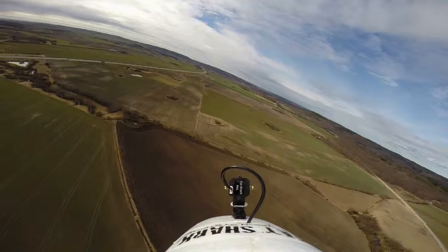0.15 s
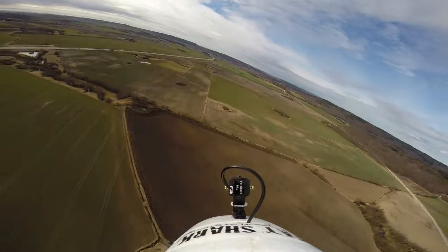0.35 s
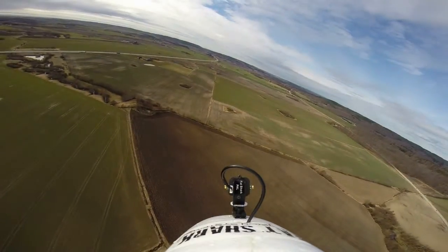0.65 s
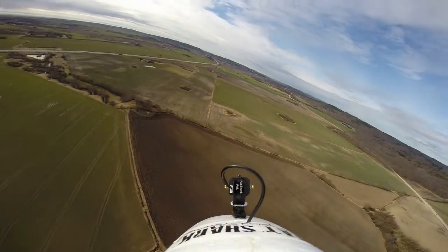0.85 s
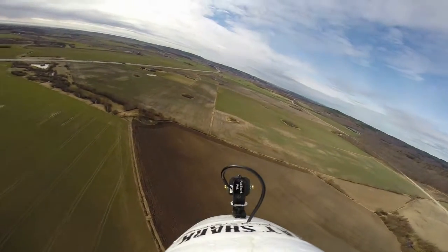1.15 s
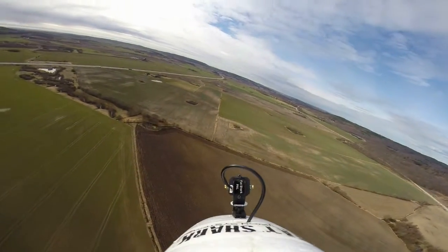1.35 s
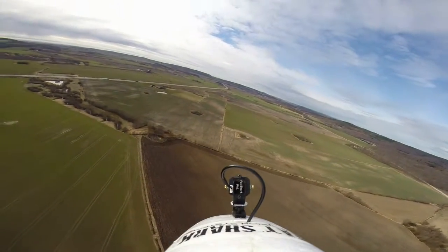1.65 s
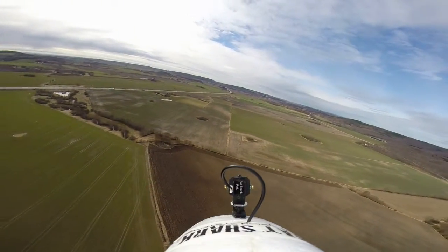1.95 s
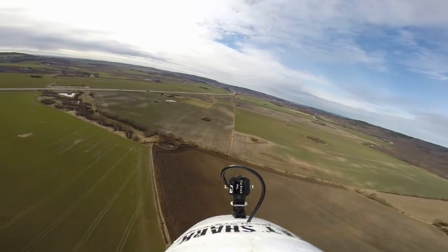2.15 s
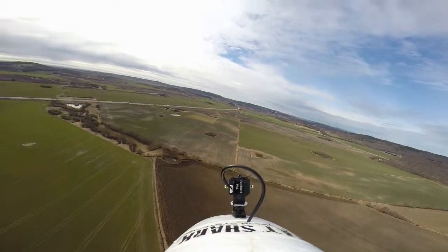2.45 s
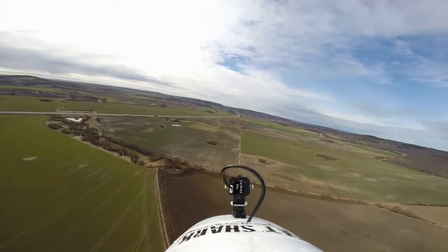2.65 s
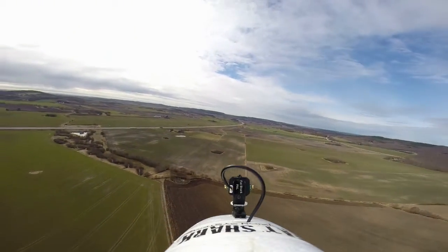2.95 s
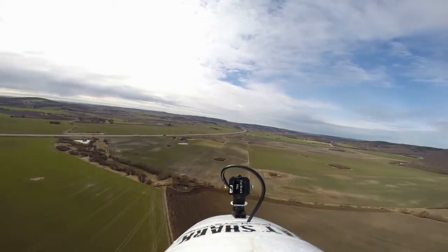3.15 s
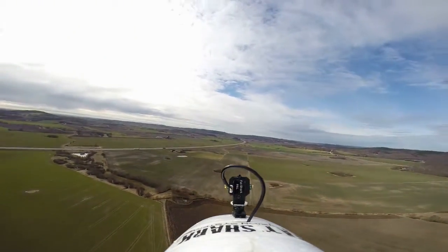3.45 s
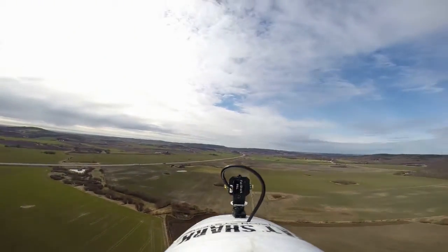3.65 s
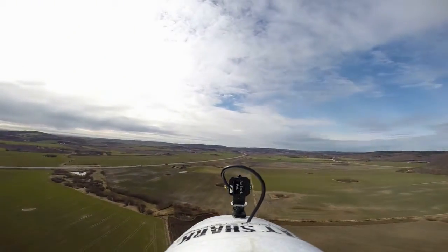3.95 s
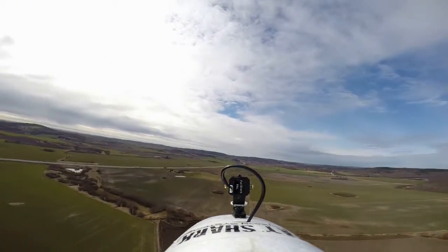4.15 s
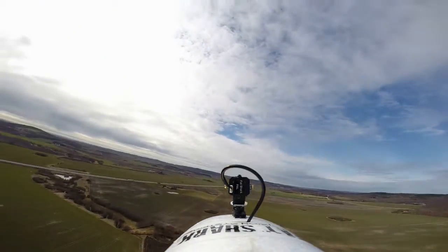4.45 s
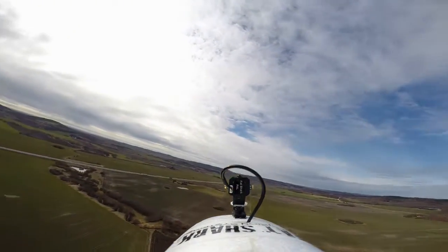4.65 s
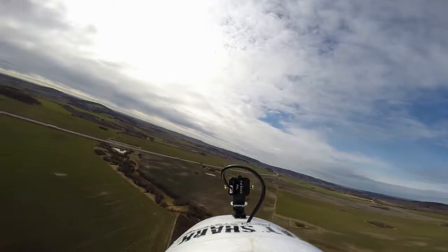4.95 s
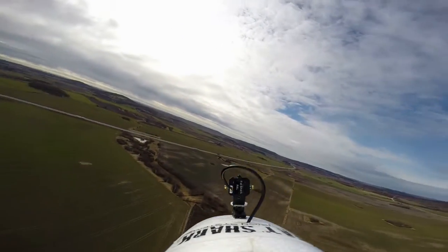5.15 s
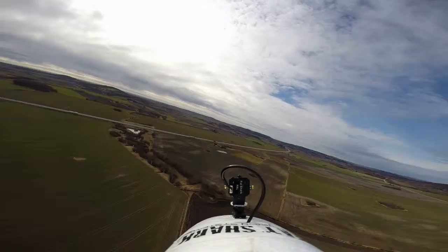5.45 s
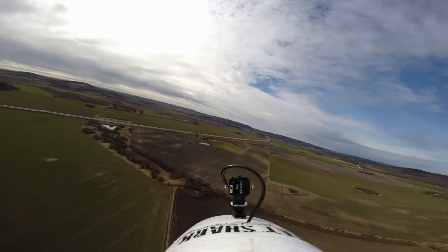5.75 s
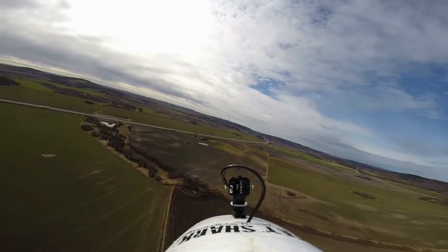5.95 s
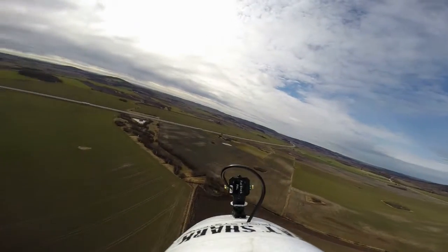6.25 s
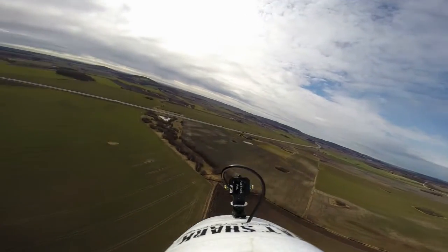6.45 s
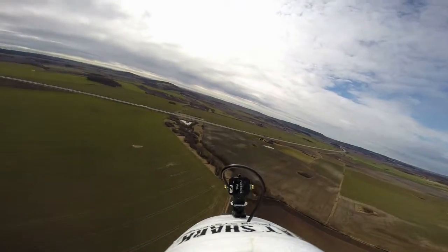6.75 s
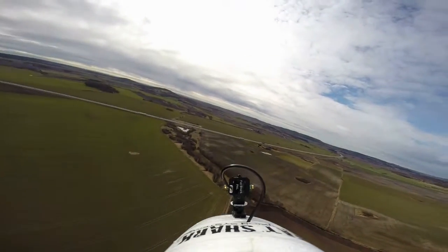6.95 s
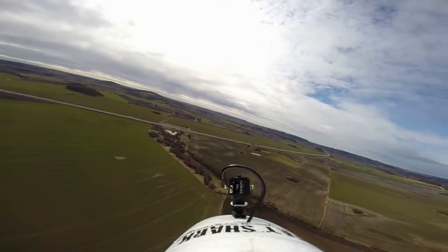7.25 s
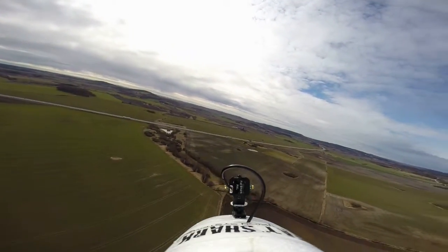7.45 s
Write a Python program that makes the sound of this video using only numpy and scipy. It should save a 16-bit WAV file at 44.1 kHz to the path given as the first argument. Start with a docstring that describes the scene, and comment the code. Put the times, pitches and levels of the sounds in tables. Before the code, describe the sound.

Onboard a model plane, the motor's whine sinks to silence, leaving rumbling, hissing wind and later rapid dry servo twitches.

```python
"""A microphone in a closed housing rides on a small electric model plane. At first the motor drives, a sum of
sines at multiples of its turns, with a thin whistle and the steady switching tone of the speed controller.
Then the throttle closes and the motor runs down until it falls silent, while the wind of the glide, coloured
noise in six layers, rumbles and hisses in the housing's resonances. Later a control servo twitches, in short
bursts of filtered noise, and whirs and ticks on its 22 ms command frame while it steers."""
import sys
import numpy as np
from scipy import signal
from scipy.fft import rfft, irfft, next_fast_len
from scipy.io import wavfile

SR = 44100
rng = np.random.default_rng(int(sys.argv[2]) if len(sys.argv) > 2 else 0)


def waveform_to_disk(signal):
    """Save audio, clipped to [-1, 1], as 16-bit WAV at the path in sys.argv[1]."""
    frames = np.transpose(np.atleast_2d(signal))
    scaled = np.clip(frames, -1, 1) * 32767
    samples = np.round(scaled).astype(np.int16)
    wavfile.write(sys.argv[1], SR, samples)


N = 334719

FRAME_S = .022   # one command frame of the servo


def amp(db):
    """Turns a level in dB into a gain."""
    return 10 ** (np.asarray(db) / 20)


def rms_one(x):
    """Scales a sound to rms 1."""
    return x / np.sqrt(np.mean(x ** 2) + 1e-20)


def in_time(rows):
    """Joins each column of a table by straight lines, one value a sample; the first column is the time."""
    s, *columns = np.transpose(rows)
    return [np.interp(np.arange(N) / SR, s, column) for column in columns]


def spells(rows, rise_db, fall_db):
    """Gain that holds within each span and slopes away on either side, in dB per second."""
    t = np.arange(N) / SR
    gain = 0
    for start, end, db in rows:
        before_db = rise_db * np.maximum(start - t, 0)
        after_db = fall_db * np.maximum(t - end, 0)
        gain = gain + amp(db - before_db - after_db)
    return gain


def drift(rate_hz):
    """Slow random wandering of rms 1: noise through two equal one-pole low-passes."""
    step = 40   # samples between computed values
    r = np.exp(-2 * np.pi * rate_hz * step / SR)
    noise = rng.standard_normal(N // step + 2002)
    slow = signal.lfilter([1], [1, -2 * r, r * r], noise)[2000:]   # without the filter's start
    return np.interp(np.arange(N) / step, np.arange(len(slow)), rms_one(slow))


def resonate(x, hz, width_hz):
    """Two-pole resonance that lets its own pitch through at gain 1 and weakens the rest."""
    r = np.exp(-np.pi * width_hz / SR)
    poles = [1, -2 * r * np.cos(2 * np.pi * hz / SR), r * r]
    return signal.lfilter(np.array([1, 0, -1]) * (1 - r * r) / 2, poles, x)


def sine(hz, start=None):
    """Gliding tone of rms 1; its start, in cycles, is random unless given."""
    if start is None:
        start = rng.random()
    cycles = np.cumsum(hz) / SR + start
    return np.sqrt(2) * np.cos(2 * np.pi * cycles)


def bell(hz, top_hz, width_hz, top_db):
    """Bell-shaped peak of a resonance, in dB at each frequency."""
    return top_db / (1 + (2 * (hz - top_hz) / width_hz) ** 2)


def coloured(spectrum, peaks=()):
    """Noise of rms 1, shaped by a spectrum and the bell-shaped peaks on it."""
    size = next_fast_len(N)
    hz = np.maximum(np.arange(size // 2 + 1) * SR / size, 1)
    points, db = np.transpose(spectrum)
    shape_db = np.interp(np.log(hz), np.log(points), db, left=-80, right=-80)
    for top_hz, width_hz, top_db in peaks:
        shape_db = shape_db + bell(hz, top_hz, width_hz, top_db)
    noise = rfft(rng.standard_normal(size))
    return rms_one(irfft(noise * amp(shape_db), size)[:N])


def power():
    """Motor power: one at open throttle, sinking to zero as it closes."""
    cut_s, fall_s = 0.82, 0.17   # start and length of the closing
    return np.clip(1 - (np.arange(N) / SR - cut_s) / fall_s, 0, 1)


def motor():
    """Multiples of the turn (orders) waver, and swell and sink as they sweep through the airframe's resonances."""
    # Speed of the shaft. Each row: time in seconds, turns per second.
    shaft = [(0.0, 134.8), (0.4, 135.2), (0.55, 134.6), (0.73, 132.6), (0.84, 126.6), (0.92, 119.8),
             (1.04, 107.3), (1.12, 101.6), (1.19, 98.05), (1.28, 94.7), (1.37, 87.3), (1.44, 83.5),
             (1.56, 73.3), (1.66, 63.6), (1.76, 53.2), (1.84, 43.1), (1.92, 32.5), (2.05, 21.7)]
    # Orders: 1-4 imbalance and blades, 11-14 and 22-26 magnet poles.
    # Each row: multiple of the turn, level in dB under power, level in dB coasting, both ahead of the airframe.
    orders = [(1, -12.5, -11.5), (2, -15, -19), (3, -20, -26), (4, -32, -31), (5, -31, -44), (6, -36, -42),
              (7, -43, -48), (8, -39, -45), (9, -33, -45), (10, -35, -45), (11, -29, -35), (12, -32, -38),
              (13, -26.5, -26), (14, -34, -35), (15, -22, -43), (16, -18, -47), (17, -18, -47),
              (18, -36, -46), (19, -44, -44), (20, -36, -34), (21, -40, -33), (22, -35, -29),
              (23, -38, -29), (24, -31, -28), (25, -40, -33), (26, -35, -31), (27, -40, -35),
              (28, -25, -36), (30, -28, -45)]
    # How the airframe carries sound to the housing, from low to high. Each row: frequency in Hz, gain in dB.
    fuselage = [(40, -20), (50, -13), (60, -5), (67, -8), (80, 0), (115, -2), (128, -10), (135, -5),
                (141, -14), (152, -21), (168, -5), (195, -1), (222, -7), (243, 0), (263, -7), (271, -20),
                (281, -5), (300, -7), (345, -4), (385, -1), (406, 2), (430, 0), (452, -13), (480, 0),
                (525, -16), (545, -9)]
    shell = [(620, -5), (680, -15), (820, 1), (930, -8), (970, -2), (1035, -20), (1090, -5), (1170, -6),
             (1235, -17), (1300, 1), (1385, -4), (1460, 7), (1550, 4), (1640, 10), (1740, 4), (1753, 1),
             (1758, -7), (1800, -2), (1890, -4)]
    mount = [(2000, -10), (2200, -14), (2350, -11), (2450, -6), (2600, 1), (2750, -2), (2860, -12),
             (3300, -17), (4100, -20)]
    # Resonances that only one order rings. Each multiple has: frequency in Hz, width in Hz, height in dB.
    bells = {11: (912, 45, 16), 24: (2250, 90, 21), 26: (2200, 100, 25)}
    # Orders die as the shaft slows. Each row: highest multiple it holds for, turns per second where the loss
    # begins, loss in dB for each turn per second below that.
    fades = [(2, 41, 1.1), (4, 88, .3), (14, 54, .4), (30, 92, 1.2)]

    turns, = in_time(shaft)
    points, carried_db = np.transpose(fuselage + shell + mount)
    drive = power()
    out = 0
    for k, powered_db, coasting_db in orders:
        hz = k * turns
        db = coasting_db + (powered_db - coasting_db) * drive
        db = db + np.interp(hz, points, carried_db)
        if k in bells:
            db = db + bell(hz, *bells[k])
        below, loss_db = next(fade[1:] for fade in fades if k <= fade[0])
        db = db + loss_db * np.minimum(turns - below, 0)
        low = k < 5
        waver_db = .5 * drift(2.5) if low else 1.9 * drift(15)
        # the low orders peak together: one push a turn
        out = out + amp(db + waver_db) * sine(hz, 0 if low else None)
    end_s = shaft[-1][0]
    return out * np.clip((end_s - np.arange(N) / SR) / .04, 0, 1)   # fades out over 40 ms


def whistle():
    """A thin tone under power, slightly unsteady in pitch and level."""
    level_db = -30 + 2.1 * drift(15)
    return amp(level_db) * sine(2330 + 12 * drift(6)) * power() ** 4


def switching_tone():
    """The speed controller switches at a fixed rate, heard as a steady high tone that comes and goes."""
    # When it sounds. Each row: start in seconds, end in seconds, level in dB.
    switching = [(0.0, 0.83, -50.5), (1.55, 2.1, -59)]
    return spells(switching, rise_db=85, fall_db=62) * sine(np.full(N, 8018))


def servo_twitches():
    """Each twitch is a few ms of gear chatter, noise that rings in the housing's resonances."""
    # Strong twitches. Each row: start in seconds, approximate peak in dB, centre frequency in Hz.
    strong = [(4.7446, -13.5, 2400), (4.883, -18, 2400), (5.146, -11.5, 1770), (5.1667, -11, 1880),
              (5.1904, -9, 1800), (5.2105, -12, 2210), (5.234, -12, 1820), (5.2774, -11, 1780),
              (5.3213, -16, 2060), (5.3445, -15, 1850), (5.365, -11.5, 1970), (5.3887, -18, 2400),
              (5.4106, -13, 2150), (5.5408, -16, 2320), (5.7887, -15, 2510), (5.917, -15, 2270),
              (5.9584, -22, 2390), (6.3325, -15, 2340), (6.51, -19, 2010), (6.532, -13, 1840),
              (6.575, -9.5, 2240), (6.6204, -18, 2280), (6.641, -12, 1830), (6.7535, -10.5, 1880),
              (6.7755, -11, 2100), (6.8169, -16, 2180), (6.8407, -11, 2140), (7.0374, -14, 2280),
              (7.1048, -12.5, 1800)]
    rise_s, fall_s = .0012, .003   # rise of the amplitude, fall of the energy
    crest = 6.04   # usual peak over rms of a burst
    t = np.arange(SR // 30) / SR
    attack = t / rise_s * np.exp(1 - t / rise_s)
    tail = 1.8 * np.exp(-t / fall_s / 2) * (t > rise_s)
    dull = signal.butter(8, 2750, fs=SR, output="sos")   # the housing keeps the top out
    out = np.zeros(N + len(t))
    for s, db, hz in strong + faint_twitches():
        chatter = rng.standard_normal(len(t)) * (attack + tail)
        burst = resonate(resonate(chatter, hz, 510), hz, 640)
        burst = burst + amp(-11) * resonate(chatter, 1290, 540)
        burst = burst + amp(-20) * resonate(chatter, 840, 290)
        burst = signal.sosfilt(dull, burst)
        out[round(s * SR):][:len(t)] += amp(db) * rms_one(burst) / crest
    return out[:N]


def faint_twitches():
    """Rows like the strong twitches, on a random share of the command frames while the servo is restless."""
    restless_s = (4.66, 7.2)   # start and end in seconds
    share = .35   # of the frames
    first, last = np.round(np.array(restless_s) / FRAME_S)
    times = np.arange(first, last) * FRAME_S
    draw = rng.random((len(times), 3))
    db = -21 + 10 * (draw[:, 0] - .5)
    hz = 2200 + 400 * (draw[:, 1] - .5)
    rows = np.transpose([times, db, hz])
    return list(rows[draw[:, 2] < share])


def servo_steering():
    """While the servo arm travels, its gears whir as coloured noise and every command frame ticks."""
    # Travels of the arm. Each row: start in seconds, end in seconds, level of the whir in dB.
    steering = [(4.9, 5.48, -57), (6.55, 6.95, -55)]
    # Colour of the whir. Each row: frequency in Hz, relative level in dB per Hz.
    gears = [(8000, -25), (8500, -2), (9000, -2), (9400, -4), (9900, -14), (10500, -6), (11200, -13),
             (12500, -16), (13500, -30)]
    whir = amp(.8 * drift(24)) * coloured(gears)
    frame = np.cos(np.pi * np.arange(N) / SR / FRAME_S) ** 6   # one pulse a frame
    ringing = resonate(resonate(rng.standard_normal(N), 1860, 690), 1800, 830)
    ticks = rms_one(frame * amp(1.7 * drift(20)) * ringing)
    travel = spells(steering, rise_db=53, fall_db=50)
    return travel * (whir + amp(24) * ticks)   # ticks 24 dB over the whir


def wind():
    """Turbulence shakes the housing; small eddies make the upper layers flutter together."""
    # Strength of the wind. Each row: time in seconds, then levels in dB of rumble, buffet, rush and cavity roar,
    # then extra brightness of the hiss in dB, shared by two shelves.
    strength = [(0.0, -33.5, -33, -38, -30.5, 10.5), (0.76, -31.5, -34.5, -32.5, -28, 4.5),
                (1.14, -32, -36, -39.5, -29, 3), (1.65, -35, -35, -37, -29, 5),
                (1.9, -30, -32.5, -36.5, -29, -1), (2.3, -26.5, -30, -33.5, -25, 0),
                (2.55, -28, -28, -30.5, -22, -1), (3.21, -21.5, -23, -27.5, -20, 3),
                (3.68, -19.5, -25.5, -30, -20.5, 2), (4.0, -25.5, -26.5, -30.5, -22.5, 2),
                (4.46, -22.5, -30, -31.5, -22, 2), (4.9, -26.5, -30.5, -36, -29.5, -4),
                (5.3, -19.5, -32.5, -34.5, -31.5, -1), (5.62, -29, -33.5, -37.5, -30, 1),
                (5.95, -23.5, -33.5, -36, -26.5, 4), (6.65, -25.5, -32, -35.5, -29, -12),
                (7.03, -25, -32.5, -37.5, -31, -16), (7.23, -26, -30.5, -35, -26.5, 7),
                (7.59, -26, -31, -33, -23, -1)]
    # Colours of the layers, from low to high. Each row: frequency in Hz, relative level in dB per Hz.
    rumble = [(11, -32), (18, 0.5), (70, 3.5), (91, 4.5), (140, -7), (180, -50), (310, -120)]
    buffet = [(71, -39), (120, -2.5), (140, -3.5), (215, -2.5), (280, -11), (330, -13.5), (430, -43),
              (730, -120)]
    rush = [(180, -41), (300, -2.5), (356, -0.5), (458, 1.5), (554, -4.5), (623, 0), (986, -3), (1300, -4),
            (1690, -23), (2860, -120)]
    roar = [(650, -41), (1100, -15.5), (1170, -11), (1500, 3.5), (1900, -1.5), (2050, -2), (2660, -10),
            (4510, -120)]
    cavity = [(1180, -43), (2000, -4), (2400, 3.5), (2700, 0), (2930, -10.5), (3200, -13.5), (4160, -28),
              (7040, -120)]
    hiss_colour = [(2900, 2.5), (3100, 3), (3700, -3), (4300, -12), (4700, -7.5), (5200, -6.5), (7000, -14),
                   (8000, -20.5), (10000, -27), (13000, -34.5), (14500, -39), (15700, -57)]
    # Resonances in the hiss. Each row: frequency in Hz, width in Hz, height in dB.
    hiss_peaks = [(4096, 420, 10.5), (5975, 570, 12.5), (6640, 350, 8), (7530, 470, 5.5)]

    rumble_db, buffet_db, rush_db, cavity_db, bright_db = in_time(strength)
    rush_share = 0.65
    roar_db = rush_share * rush_db + (1 - rush_share) * cavity_db + 1.5
    cavity_mean_db = -25
    # the hiss swings wider than the cavity and lies 7 dB below it at the mean
    hiss_db = cavity_mean_db + 1.18 * (cavity_db - cavity_mean_db) - 7

    hiss = coloured(hiss_colour, hiss_peaks)
    for edge_hz in (7500, 10500):   # the brightness column lifts or lowers the top, shelf on shelf
        high_pass = signal.butter(2, edge_hz, "high", fs=SR, output="sos")
        hiss = hiss + (amp(.5 * bright_db) - 1) * signal.sosfilt(high_pass, hiss)

    eddies = drift(19)
    out = amp(rumble_db + 0.54 * drift(16)) * coloured(rumble)
    out += amp(buffet_db + 0.63 * drift(8.2)) * coloured(buffet)
    out += amp(rush_db + .5 * eddies) * coloured(rush)
    out += amp(roar_db + 0.56 * eddies + 0.45 * drift(40)) * coloured(roar)
    out += amp(cavity_db + 1.07 * eddies + 0.39 * drift(35)) * coloured(cavity)
    out += amp(hiss_db + 0.57 * eddies + 0.85 * drift(50)) * hiss
    return out


def scene():
    """All sources add up at one microphone in the housing."""
    plane = motor() + whistle() + switching_tone()
    servo = servo_twitches() + servo_steering()
    return (plane + servo + wind())[None]


def record(dry):
    """Rounds the peaks, fades in the first 60 samples and cuts the top."""
    rounded = .7 * np.tanh(dry / .7)
    faded = rounded * np.minimum(np.arange(N) / 60, 1)
    low_pass = signal.ellip(10, .5, 60, 15700, fs=SR, output="sos")   # ripple .5 dB, stop 60 dB, edge in Hz
    return signal.sosfilt(low_pass, faded)


dry = scene()
out = record(dry)
waveform_to_disk(out)
```